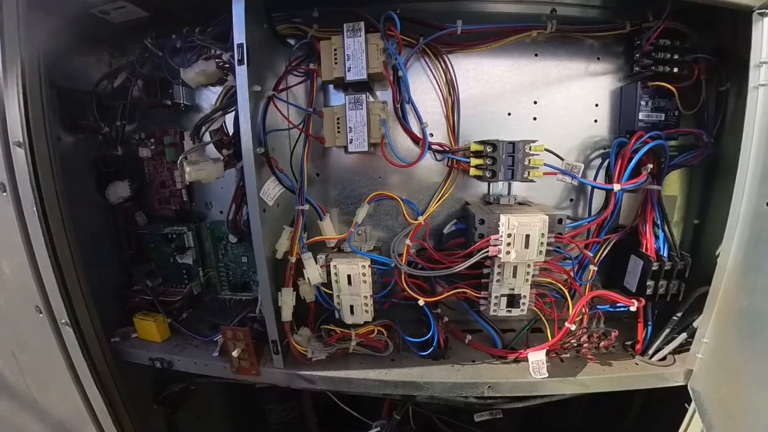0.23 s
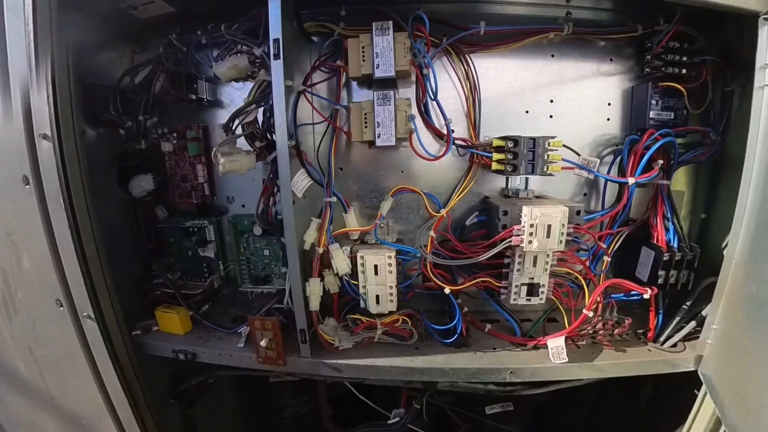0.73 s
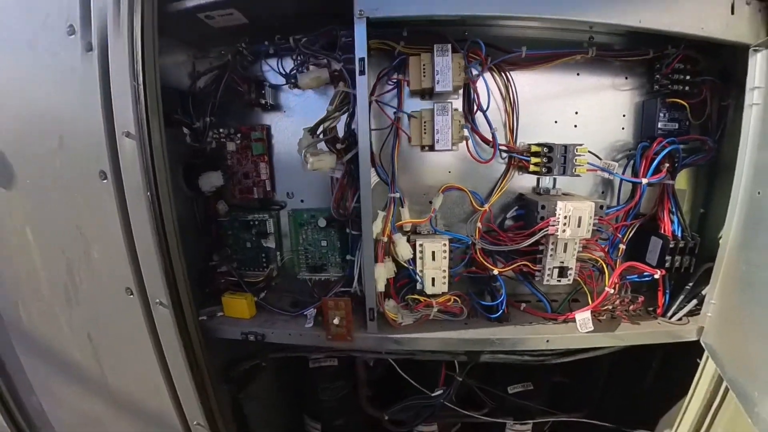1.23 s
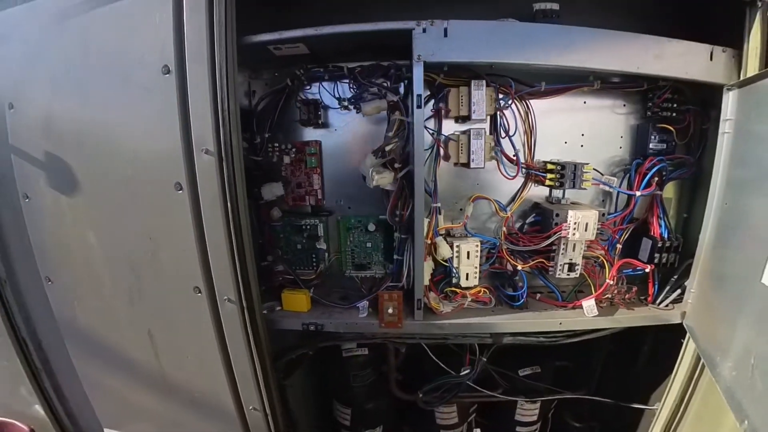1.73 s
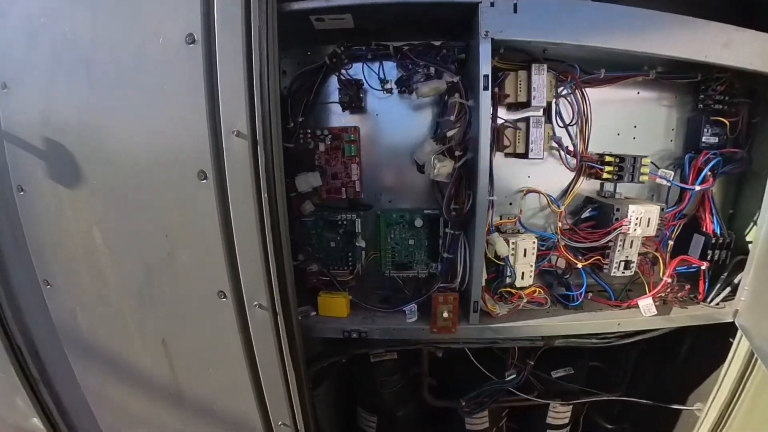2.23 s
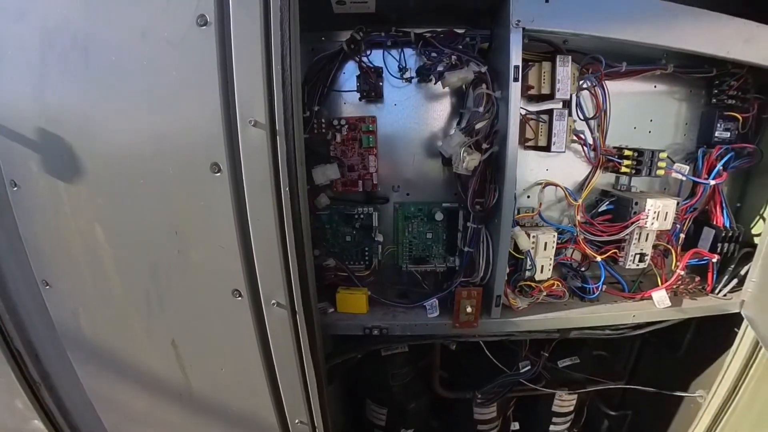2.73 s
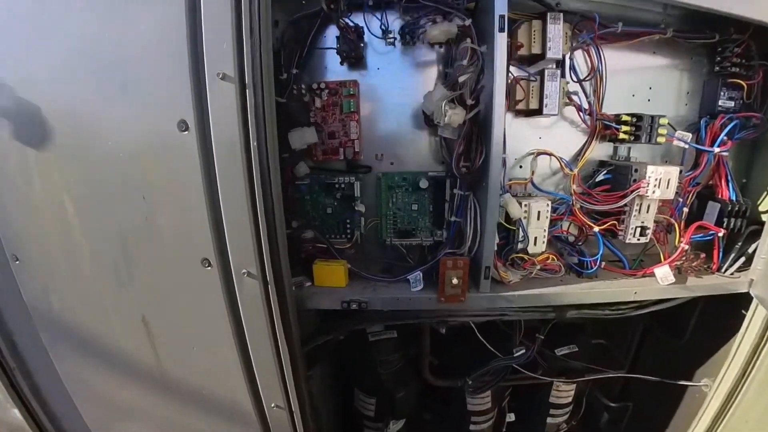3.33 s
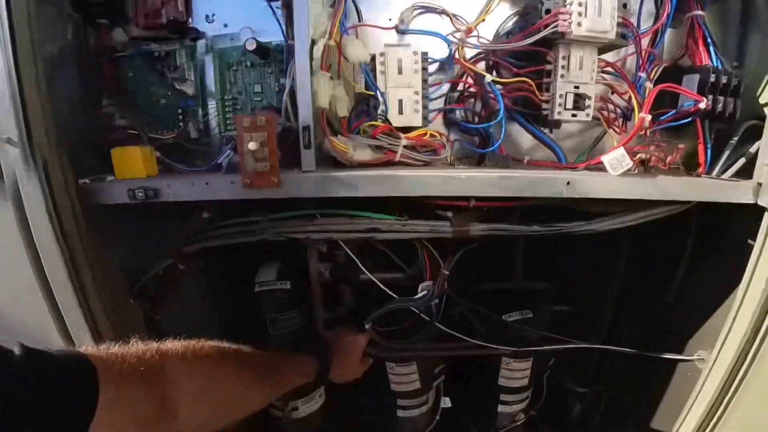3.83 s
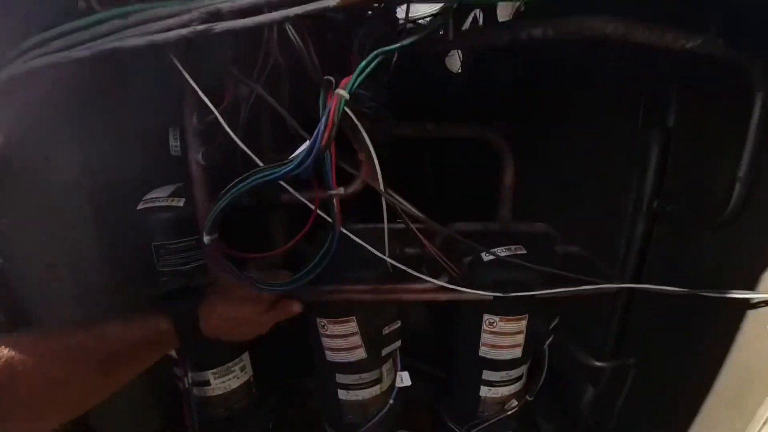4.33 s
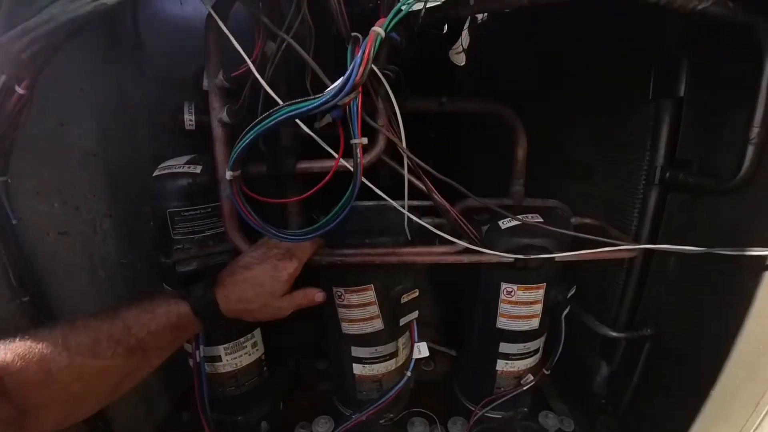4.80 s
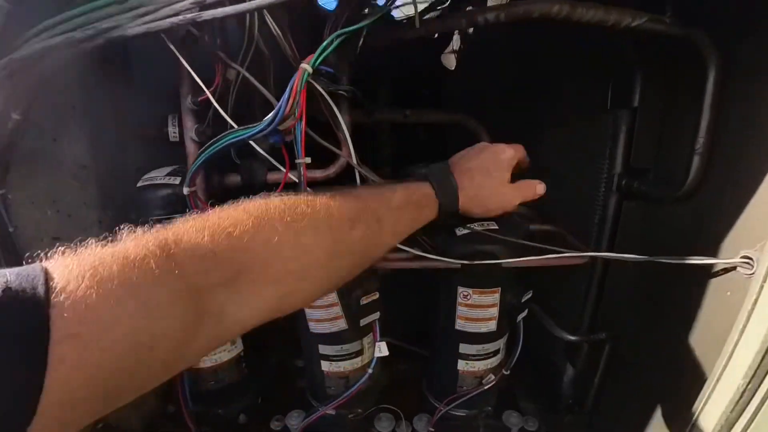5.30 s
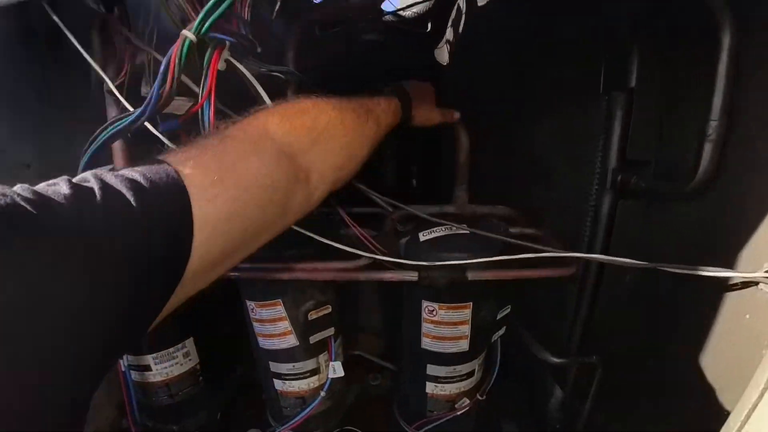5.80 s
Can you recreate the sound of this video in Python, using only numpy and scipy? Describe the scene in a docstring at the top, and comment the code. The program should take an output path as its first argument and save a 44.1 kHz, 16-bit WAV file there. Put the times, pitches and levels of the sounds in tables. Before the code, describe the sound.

Loud rooftop air conditioner drones with fan roar and compressor hum while wind rumbles and bumps against a microphone moving into the open bay.

```python
"""Rooftop, at an air conditioner with its service panel open; one microphone moves into the compressor bay.
Condenser fans, harmonics of the blade rate over a roar of air, weaken on the way in. Compressors hum at
shaft harmonics; their throbbing gas noise hisses and rings the pipework. The bay roars, shaped noise, over a
low band of noise near 220 Hz. Wind noise on the microphone rumbles and bumps: low noise and pressure swings."""
import sys
import numpy as np
from scipy import signal
from scipy.fft import rfft, irfft, next_fast_len
from scipy.io import wavfile
from scipy.ndimage import uniform_filter1d, minimum_filter1d, map_coordinates

SR = 44100
rng = np.random.default_rng(int(sys.argv[2]) if len(sys.argv) > 2 else 0)


def output_pcm(signal):
    """Save a mono or channel-first signal as 16-bit PCM at the path in sys.argv[1].

    Samples are clipped to [-1, 1] before scaling.
    """
    pcm = np.clip(np.atleast_2d(signal).T, -1, 1) * 32767
    wavfile.write(sys.argv[1], SR, np.round(pcm).astype(np.int16))


N = 267113


def amp(db):
    """Decibels to gain."""
    return 10 ** (np.asarray(db) / 20)


def unit(x):
    """Scale to rms 1."""
    return x / np.sqrt(np.mean(x ** 2) + 1e-20)


def curves(rows):
    """One value per sample for each column after the time."""
    time_s, *columns = np.transpose(rows)
    return [np.interp(np.arange(N) / SR, time_s, column) for column in columns]


def wobble(rate_hz):
    """Smooth random curve with rate_hz knots a second."""
    knots = rng.standard_normal(int(N * rate_hz / SR) + 4)
    return map_coordinates(knots, [np.arange(N) * rate_hz / SR])


def rise_and_fall(middle_s, length_s):
    """Smooth rise and fall around middle_s."""
    return np.exp(-2 * ((np.arange(N) / SR - middle_s) / length_s) ** 2)


def filtered(x, response):
    """x times a response of frequency."""
    size = next_fast_len(N + SR // 2)
    return irfft(rfft(x, size) * response(np.fft.rfftfreq(size, 1 / SR)), size)[:N]


def coloured(x, spectrum):
    """x shaped by a spectrum of (Hz, dB) points, at rms 1."""
    knot_hz, knot_db = np.transpose(spectrum)
    return unit(filtered(x, lambda hz: amp(np.interp(np.log(hz + 1), np.log(knot_hz), knot_db))))


def rush(spectrum):
    """Coloured noise of rms 1."""
    return coloured(rng.standard_normal(N), spectrum)


def resonance(x, hz, width_hz):
    """x through one damped resonance with unit gain at its peak."""
    return filtered(x, lambda f: 1j * f * width_hz / (hz * hz - f * f + 1j * f * width_hz))


def patches(x, depth_db):
    """Short random swells, each in its own stretch of the spectrum, deepest in the treble."""
    hz, _, spectra = signal.stft(x, SR, nperseg=512)
    field = uniform_filter1d(rng.standard_normal(spectra.shape), size=5, axis=0)
    field = unit(uniform_filter1d(field, size=10, axis=1))
    depth_share = np.interp(hz, [2000, 4500], [.5, 1])[:, None]
    varied = spectra * amp(depth_db * depth_share * field)
    return unit(signal.istft(varied, nperseg=512)[1][:N])


def wander(x, share, rate_hz):
    """x with its pitch straying by a small share."""
    return map_coordinates(x, [np.cumsum(1 + share * wobble(rate_hz))], mode="mirror")


def swell():
    """How far the treble stands above its mean level, in dB; the machine's sound follows it."""
    # treble level: time_s, level_db
    treble = [(0.03, -48.5), (0.98, -47), (1.03, -50), (1.25, -50), (1.33, -50.5), (1.375, -49.5),
              (1.42, -52.5), (1.54, -53.5), (1.69, -44.5), (1.76, -47.5), (1.82, -54), (1.92, -58.5),
              (2.04, -49), (2.31, -47.5), (2.72, -50), (2.82, -52), (3.04, -54.5), (3.19, -50), (3.24, -53),
              (3.45, -47), (3.55, -54.5), (3.8, -54.5), (3.92, -47), (4.05, -50), (4.32, -45), (4.5, -49),
              (4.72, -45), (4.77, -49.5), (5.25, -44.5), (5.35, -50), (5.58, -42.5), (5.8, -49),
              (5.95, -49.5), (6.0, -51.5)]
    level_db, = curves(treble)
    return level_db - level_db.mean()


def placed(open_db, inside_db):
    """Level in dB on the way into the bay: open-air value plus depth (0-1) times the change inside."""
    # microphone's way from open air into the bay: time_s, depth (0-1)
    bay_depth = [(1.05, 0), (1.5, 0.14), (3.5, 0.41), (4.3, 0.57), (5.5, 0.89)]
    depth, = curves(bay_depth)
    return open_db + inside_db * depth


def turns(hz, drift, rate_hz):
    """Running count of revolutions at a slightly unsteady speed."""
    return np.cumsum(hz * (1 + drift * wobble(rate_hz))) / SR


def tones(cycle, orders, flutter_db, smear_cycles):
    """Harmonics of a rotation; each shifts level on the way in and wavers in strength and phase."""
    out = 0
    for multiple, open_db, inside_db in orders:
        flutter = flutter_db * (wobble(3.977) + wobble(11)) / np.sqrt(2)
        level_db = placed(open_db, inside_db) + flutter
        phase = multiple * cycle + rng.random() + smear_cycles * wobble(16)
        out = out + amp(level_db) * np.sin(2 * np.pi * phase)
    return out


def drone(cycle):
    """Blade harmonics 2, 4 and 5 rise and sink, each on its own course."""
    # levels of the three harmonics before the common trim: time_s, relative_db
    second_tone = [(0, -30), (0.25, -27), (0.33, -26), (0.42, -14), (0.55, -34), (0.68, -24), (0.8, -26.5),
                   (0.98, -19.5), (1.09, -29), (1.19, -20.5), (1.58, -35), (1.8, -25), (1.95, -34),
                   (2.15, -33), (2.3, -23.5), (2.7, -27), (2.9, -32), (3.5, -27.5), (4.19, -24),
                   (4.35, -34), (4.58, -23.5), (4.67, -32), (4.87, -21.5), (5.1, -26.5), (5.5, -31),
                   (5.62, -19), (5.74, -38), (6, -23.5)]
    fourth_tone = [(0.02, -46), (0.2, -19.5), (0.35, -27.5), (0.6, -23.5), (1, -26), (1.92, -38),
                   (3.17, -28), (3.4, -37.5), (4.48, -30.5), (5.8, -35)]
    fifth_tone = [(0, -41), (0.17, -21.5), (0.3, -34), (0.47, -25), (0.8, -29.5), (1, -20), (1.19, -39),
                  (1.5, -32.5), (1.62, -26.5), (2.1, -31.5), (2.29, -22), (2.45, -31), (2.65, -30.5),
                  (3.05, -36), (3.19, -18.5), (3.32, -38), (3.5, -28), (3.95, -31), (4.08, -44),
                  (4.45, -28.5), (4.65, -41), (5.2, -26.5), (5.58, -41), (6, -30.5)]
    trim_db, flutter_db, smear_cycles = -0.6, 2.3, .06
    out = np.zeros(N)
    for multiple, course in ((2, second_tone), (4, fourth_tone), (5, fifth_tone)):
        relative_db, = curves(course)
        phase = multiple * cycle + rng.random() + smear_cycles * wobble(24)
        tone = unit(np.sin(2 * np.pi * phase))
        out += amp(trim_db + relative_db + flutter_db * wobble(26)) * tone
    return out


def fans():
    """Blade-passing tones over the roar of moved air; a second, slightly faster fan beats with the first."""
    # weaker blade harmonics: multiple of blade rate, relative_db, change_deep_in_bay_db
    blade_tones = [(1, -15, -0.5), (3, -18.5, 16), (6, -11, 5), (7, -16, -2.5)]
    # spectrum of moved air: frequency_hz, relative_db
    fan_air = [(40, -12.5), (120, -14), (250, -4.5), (400, 0), (465, -4.5), (510, -12.5), (700, -15.5),
               (1000, -43), (2000, -44.5), (5000, -90)]
    blade_hz, beat_hz = 75.65, 0.5
    open_db, inside_db, swell_share = -18, -9.5, 0.47
    # brief dip of the weaker tones and roar
    dip_db = -5 * rise_and_fall(middle_s=1.93, length_s=0.059)
    fan_db = placed(open_db, inside_db) + swell_share * swell() + dip_db + 0.52 * wobble(7.2)
    cycle = turns(blade_hz, drift=0.00443, rate_hz=7)
    second_cycle = turns(blade_hz + beat_hz, drift=0.0043, rate_hz=4)
    first = tones(cycle, blade_tones, flutter_db=2.5, smear_cycles=0.029)
    second = tones(second_cycle, blade_tones, flutter_db=2.5, smear_cycles=0.1)
    roar = amp(1.84 * wobble(40)) * patches(rush(fan_air), depth_db=3.0)
    mix = amp(-1.5) * first + amp(-8.0) * second + amp(-3.0) * roar
    return drone(cycle) + amp(fan_db) * mix


def whines():
    """Narrow bands of gas noise swell, flutter and fade as the microphone moves among the pipes."""
    # pipe resonances passed: middle_s, length_s, pitch_hz, width_hz, relative_db
    pipe_whines = [(0.025, 0.1, 2160, 300, -0.5), (0.12, 0.26, 4245, 280, -9), (.75, .5, 4050, 280, -11.5),
                   (0.64, 0.32, 4700, 110, -9.5), (1.2, 0.22, 4100, 400, -10), (2.02, 0.2, 2020, 200, -7),
                   (2.33, .2, 1440, 200, -3), (2.51, .18, 4740, 150, -9.5), (3.12, .3, 4695, 80, -8),
                   (3.0, .7, 5970, 125, -14), (3.15, .25, 1456, 160, -2), (4.42, .3, 4280, 260, -11),
                   (5.13, .08, 1900, 800, -2), (5.2, 0.09, 1420, 300, 3), (5.6, .16, 1430, 340, -5),
                   (5.88, 0.32, 4080, 200, -9), (5.91, .12, 4700, 160, -10)]
    out = np.zeros(N)
    for middle_s, length_s, hz, width_hz, relative_db in pipe_whines:
        band = resonance(resonance(rng.standard_normal(N), hz, width_hz), hz, width_hz)
        band = wander(band, share=.004, rate_hz=12)
        out += amp(relative_db + 3.2 * wobble(22)) * rise_and_fall(middle_s, length_s) * unit(band)
    return out


def pipework(throb):
    """Throbbing gas flow rings the pipes and shell; each resonance wavers on its own."""
    # pipe and shell resonances: pitch_hz, width_hz, relative_db
    pipes = [(3945, 44, 4), (4200, 220, 1), (4690, 55, 1), (5620, 160, -3), (6000, 140, -6),
             (7020, 55, -3.5), (7710, 55, -5), (8530, 50, -10), (8885, 50, -10)]
    flow = throb * rng.standard_normal(N)
    out = np.zeros(N)
    for hz, width_hz, relative_db in pipes:
        waver_db = 2.5 * wobble(12) + 1.2 * wobble(3)
        out += amp(relative_db + waver_db) * resonance(flow, hz, width_hz)
    return unit(out)


def compressors():
    """Gas is squeezed out once a turn: a hum, a fine buzz and a throbbing hiss that rings the pipes."""
    # hum harmonics: multiple of shaft rate, relative_db, change_deep_in_bay_db
    hum_tones = [(2, 4.5, 0.5), (6, 0.5, -3), (7, 6.5, -1.5), (12, 2, -2), (16, -5, 1), (20, -6, -1.5),
                 (24, -11.5, -0.5), (26, -16, -4)]
    # spectrum of gas hiss: frequency_hz, relative_db
    gas_spectrum = [(500, -12.5), (1400, 0.5), (2000, 6.5), (2550, 2.5), (2900, -3), (3700, -3),
                    (5100, -4.5), (6100, -4.5), (6700, -6.5), (7500, -8), (9000, -15), (9500, -19.5),
                    (10500, -25.5), (12000, -76)]
    shaft_hz = 58.83
    level_db = placed(open_db=-46.5, inside_db=-0.1) + swell() + 0.52 * wobble(19)
    cycle = turns(shaft_hz, drift=.0001, rate_hz=1.5)
    throb = amp(.65 * np.sin(2 * np.pi * cycle))
    # the same rubbing pattern comes round with every turn of the shaft
    pattern = irfft(np.exp(2j * np.pi * rng.random(round(SR / shaft_hz))))
    buzz = unit(map_coordinates(pattern, [cycle % 1 * len(pattern)], mode="grid-wrap"))
    gas = coloured(throb * (rng.standard_normal(N) + amp(-12) * buzz), gas_spectrum)
    hiss = amp(0.94 * wobble(120)) * patches(gas, depth_db=3.0)
    ring = pipework(throb)
    hum = tones(cycle, hum_tones, flutter_db=2.5, smear_cycles=.04)
    return amp(level_db) * (hiss + amp(-11) * ring + whines() + amp(0.5) * hum)


def bay():
    """Machine noise roars in the sheet-metal bay, with a low band of noise near 220 Hz."""
    # spectrum of the roar: frequency_hz, relative_db
    bay_air = [(300, -22.5), (550, 4.5), (700, 2.5), (900, -2), (1150, -7), (1320, -11), (1370, -10.5),
               (1470, -10), (1510, -17.5), (2500, -32), (5000, -73)]
    # level of the low noise band: time_s, level_db
    low_band_course = [(1.1, -34), (1.7, -40), (3.6, -35.5), (4.3, -27.5), (5, -31.5)]
    low_band_hz, swell_share = 219.6, 0.9
    roar_db = placed(open_db=-32.5, inside_db=0.5) + swell_share * swell() + 1.82 * wobble(45)
    roar = amp(roar_db) * patches(rush(bay_air), depth_db=2.5)
    low_band_db, = curves(low_band_course)
    low_band = resonance(rng.standard_normal(N), low_band_hz, width_hz=46)
    low_band = unit(resonance(low_band, low_band_hz, width_hz=82))
    return roar + amp(low_band_db + 1.1 * wobble(20)) * low_band


def gusting():
    """Buffet and rumble levels in dB, before trims: restless turbulence with a few gusts and lulls."""
    # turbulence strength: time_s, relative_db
    breeze = [(0, -21.5), (1.1, -22), (1.4, -21.5), (3.5, -17), (4.9, -20), (5.8, -17.5)]
    # gusts and lulls: middle_s, length_s, buffet_change_db, rumble_change_db
    gusts = [(0.432, .14, -4, 4.5), (0.642, 0.086, 1.5, 0), (0.853, .1, 0, -7.5), (1.194, 0.071, 0, 12.5),
             (1.326, 0.11, 6, 2), (1.684, 0.063, 4, -2), (1.985, 0.12, -9, -14), (2.26, 0.046, -6, 6),
             (2.524, .06, 2.5, -8), (2.786, 0.06, 3, 7), (3.092, .1, -3, -6), (3.217, 0.042, 0.5, 3),
             (3.29, .06, -3.5, -10), (3.603, 0.23, -1, -4.5), (3.87, 0.2, -4.5, -3),
             (4.077, 0.079, -6.5, -5), (5.11, .05, 1, 3), (5.363, 0.094, -2.5, 5), (5.805, 0.078, 2.5, 4.5)]
    breeze_db, = curves(breeze)
    buffet_db = breeze_db + 1.14 * wobble(17)
    rumble_db = buffet_db - 7.5 + 2.4 * wobble(12)
    for middle_s, length_s, buffet_change_db, rumble_change_db in gusts:
        shape = rise_and_fall(middle_s, length_s)
        buffet_db = buffet_db + buffet_change_db * shape
        rumble_db = rumble_db + rumble_change_db * shape
    return buffet_db, rumble_db


def pressure_swings(rows, skew_rad):
    """Each row is one lopsided pressure swing, shorter the higher its pitch."""
    t = np.arange(-SR // 50, SR // 50) / SR
    out = np.zeros(N + 2 * len(t))
    for middle_s, level_db, hz in rows:
        lean = np.exp(1j * skew_rad * rng.standard_normal())
        swing = np.real(lean / (1 - 2.5j * hz * t) ** 3)
        out[max(round(middle_s * SR), 0):][:len(t)] += amp(level_db) * swing
    return out[len(t) // 2:][:N]


def wind():
    """Turbulence on the microphone: lumpy rumble, a patter of small swings and louder low bumps."""
    # louder low bumps in the wind noise, some sharp, many only peaks of the random buffeting:
    # middle_s, level_db, pitch_hz
    bump_rows = [(1.198, -9, 130), (1.331, -7, 200), (1.358, -8, 170), (1.395, -8, 190), (1.485, -4.5, 460),
                 (1.665, -7.5, 240), (1.793, -3.5, 190), (1.813, -8, 170), (1.8715, -1.5, 172),
                 (2.364, -5.5, 440), (2.389, -8, 260), (2.64, -5.5, 220), (2.83, -7, 232), (2.863, -9, 160),
                 (2.964, -6.5, 201), (3.023, -4.5, 410), (3.235, -7, 150), (3.315, -8, 290),
                 (3.535, -8, 230), (3.543, -8.5, 410), (3.639, -8, 270), (3.66, -3.5, 400),
                 (3.743, -2, 235), (3.975, -7, 245), (3.993, -3, 270), (4.352, -1.5, 410), (4.403, -7, 360),
                 (4.49, -6.5, 300), (4.661, -7.5, 200), (4.751, -7, 240), (4.867, -4.5, 430),
                 (5.003, -7.5, 380), (5.291, -.5, 490), (5.409, -6, 420), (5.612, -5.5, 530),
                 (5.754, -6, 230), (5.807, -5, 450), (5.842, -5, 188), (5.967, -6.5, 185), (5.979, -3, 245)]
    # noise spectra: frequency_hz, relative_db
    buffet_spectrum = [(30, -33), (80, -23), (120, 1.5), (195, 1.5), (280, -2.5), (450, -8.5), (900, -27.5),
                       (1500, -38.5), (3000, -95.5)]
    rumble_spectrum = [(15, -36), (28, -14), (43, 0), (72, 0), (100, -4), (200, -25), (600, -80)]
    wake_delay_s, wake_db, wake_hz = 0.0026, -7, 165
    buffet_db, rumble_db = gusting()
    draw = rng.random((300, 3))
    small_swings = np.column_stack([draw[:, 0] * N / SR, -14 * draw[:, 1], 110 * 3.4 ** draw[:, 2]])
    patter = unit(pressure_swings(small_swings, skew_rad=2.93))
    # each lump of air shakes the deep and the middle bass together
    lumps = wobble(36)
    buffet = amp(buffet_db) * (amp(-4.5 + 3.0 * lumps) * rush(buffet_spectrum) + amp(-6.5) * patter)
    rumble = amp(rumble_db - 5.6 + 2 * lumps) * rush(rumble_spectrum)
    # a weaker suction follows each bump
    wake_rows = [(s + wake_delay_s, db + wake_db, wake_hz) for s, db, _ in bump_rows]
    wakes = pressure_swings(wake_rows, skew_rad=0.4)
    low_bumps = pressure_swings(bump_rows, skew_rad=0.64) - wakes
    # air pressure on the port carries no treble
    return rumble + filtered(buffet + low_bumps, lambda hz: 1 / np.sqrt(1 + (hz / 1400) ** 12))


def scene():
    """Machine and wind at one microphone."""
    return (fans() + compressors() + bay() + wind())[None]


def record(dry):
    """Cut the deepest bass, duck briefly on peaks and remove all above the band limit."""
    low_cut_hz, top_hz, ceiling = 32, 11600, .95
    x = filtered(dry[0], lambda hz: (hz / low_cut_hz) ** 4 / np.sqrt(1 + (hz / low_cut_hz) ** 8))
    needed = np.minimum(1, ceiling / (np.abs(x) + 1e-9))
    gain = uniform_filter1d(minimum_filter1d(needed, size=SR // 80), size=SR // 100)
    return filtered(x * gain, lambda hz: hz < top_hz)[None]


dry = scene()
out = record(dry)
output_pcm(out)
```